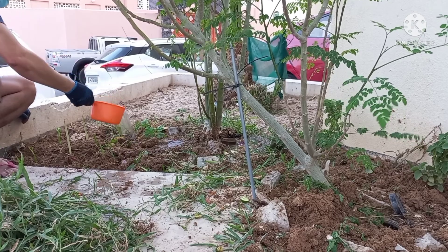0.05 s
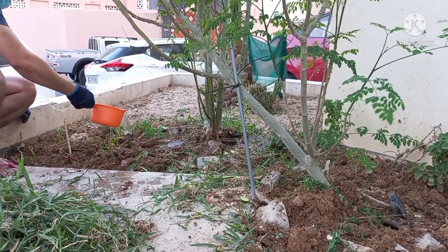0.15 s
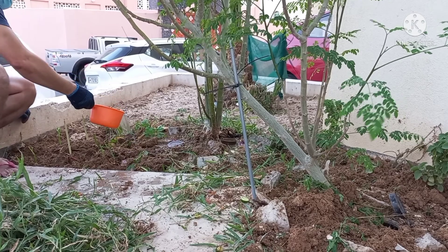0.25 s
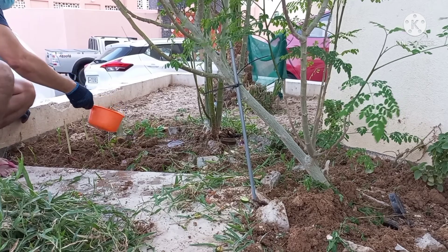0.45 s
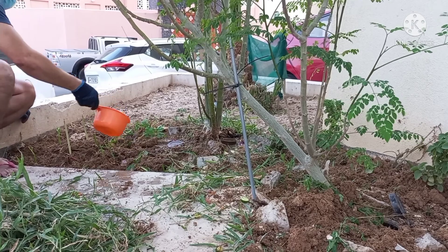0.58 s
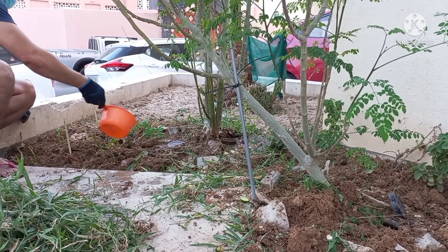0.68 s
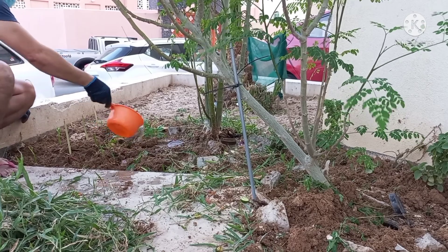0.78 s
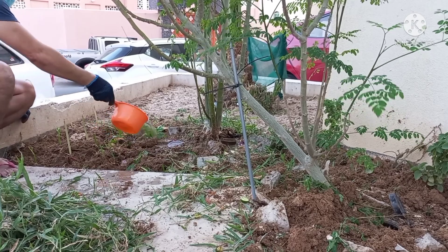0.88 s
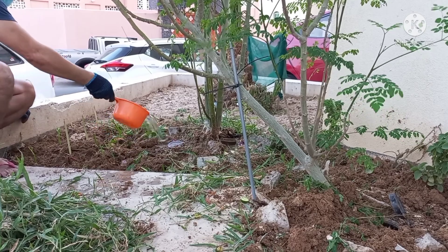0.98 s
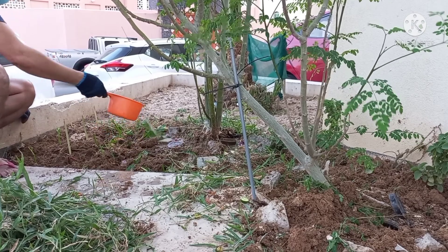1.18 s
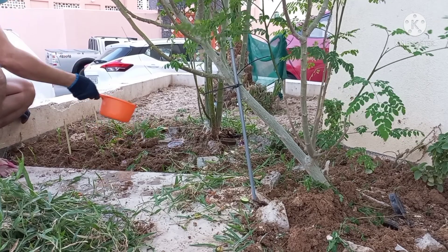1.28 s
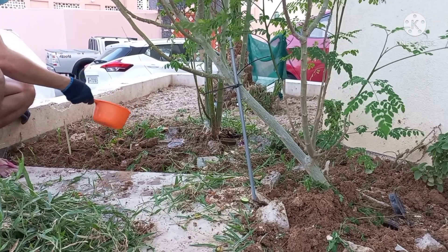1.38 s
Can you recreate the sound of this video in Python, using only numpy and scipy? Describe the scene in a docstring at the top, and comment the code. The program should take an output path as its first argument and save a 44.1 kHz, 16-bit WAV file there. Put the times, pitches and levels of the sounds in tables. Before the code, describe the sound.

Two scoops of water patter onto soil and leaves over a faint traffic rumble.

```python
"""A garden bed, with distant traffic rumbling throughout. Water is flung from a plastic scoop and comes
down near the microphone: a soft shower of tiny drops on soil and leaves, a few larger ones that plink,
small bubbles where it pools. A short gust buffets the microphone as the water lands. A thin sizzle
fills the lull, then, about a second in, another, lighter throw falls in weaker wind."""
import sys
import numpy as np
from scipy import signal
from scipy.fft import rfft, irfft
from scipy.io import wavfile

SR = 44100
rng = np.random.default_rng(int(sys.argv[2]) if len(sys.argv) > 2 else 0)


def wav_record(signal):
    """Record a signal, one row per channel, as 16-bit PCM in the file named by sys.argv[1]."""
    frames = np.transpose(np.atleast_2d(signal))
    bounded = np.clip(frames, -1, 1)
    # unit amplitude maps onto the largest positive 16-bit level
    quanta = np.round(bounded * 32767).astype(np.int16)
    wavfile.write(sys.argv[1], SR, quanta)


N = 63945
TIME = np.arange(N) / SR
BIN_HZ = np.arange(N // 2 + 1) * SR / N
NONZERO_HZ = np.maximum(BIN_HZ, 1)
LOW_CUT_HZ, HIGH_CUT_HZ = 32, 14250
FALL_60_DB = np.log(1000)   # exponent that takes a ring down by 60 dB


def from_db(db):
    """Decibels to gain."""
    return 10 ** (np.asarray(db) / 20)


def unit_rms(x):
    """Scale to unit power."""
    return x / np.sqrt(np.mean(x ** 2) + 1e-20)


def envelope(rows):
    """Gain through (s, dB) points."""
    return from_db(np.interp(TIME, *np.transpose(rows)))


def swells(rows):
    """Gain from bell-shaped swells of (centre s, peak dB, half length s)."""
    return sum(from_db(db) * np.exp(-.5 * ((TIME - s) / length) ** 2) for s, db, length in rows)


def colour(x, points):
    """Filter by (Hz, dB) points, falling 30 dB an octave past both ends; rms 1."""
    hz, db = np.transpose(points)
    octave, known = np.log2(NONZERO_HZ), np.log2(hz)
    outside = np.abs(octave - np.clip(octave, known[0], known[-1]))
    gain = from_db(np.interp(octave, known, db) - 30 * outside)
    return unit_rms(irfft(rfft(x) * gain, N))


def noise(points):
    """Noise with the given spectrum; rms 1."""
    return colour(rng.standard_normal(N), points)


def band_noise(hz, width_hz):
    """Noise in one bell-shaped band, a random wobble when centred on 0 Hz; rms 1."""
    bell = np.exp(-2 * ((BIN_HZ - hz) / width_hz) ** 2)
    return unit_rms(irfft(rfft(rng.standard_normal(N)) * bell, N))


def widen(mid, side, side_db):
    """Left and right from a middle and a weaker side signal."""
    return mid + from_db(side_db) * side * np.array([[1], [-1]])


def pan(db):
    """Left and right gains for a level difference; positive leans left."""
    return from_db(db * np.array([[.5], [-.5]]))


# The open air over the garden. Each row: frequency in Hz, relative level in dB.
AIR_SPECTRUM = [(1500, -3), (2500, -24), (4000, -12), (5500, 2.5), (7500, 6.5), (10000, -1.5), (12500, -6),
                (14000, -3)]
def open_air():
    """A very faint, wide hiss all round the microphone."""
    return from_db(-87) * widen(noise(AIR_SPECTRUM), noise(AIR_SPECTRUM), side_db=-7)


# The street, heard from far off. Each row: frequency in Hz, relative level in dB.
TRAFFIC_SPECTRUM = [(25, -30), (45, 0.5), (70, -4), (105, -3), (135, -13.5), (200, -13), (265, -16.5),
                    (350, -20.5), (500, -24.5), (800, -29), (1020, -28), (1400, -34.5), (1800, -36.5),
                    (2300, -49.5), (3200, -50)]
def distant_traffic(rumble_db=-55.5, waver_db=1.1, tyre_hz=817, engine_db=-59.5):
    """Far traffic rumbles, its tyre noise a little to the right, and one engine drones."""
    rumble = widen(noise(TRAFFIC_SPECTRUM), noise(TRAFFIC_SPECTRUM), side_db=-27.5)
    rumble *= from_db(rumble_db + waver_db * band_noise(0, width_hz=10))
    tyre_band = np.exp(-2 * np.log2(NONZERO_HZ / tyre_hz) ** 2)
    rumble = irfft(rfft(rumble) * pan(-4.5 * tyre_band), N)
    engine = from_db(engine_db) * band_noise(hz=99.9, width_hz=3.1)
    return (rumble + engine) * pan(0.32)


# Turbulence right at the microphone. Each row: frequency in Hz, relative level in dB.
WIND_SPECTRUM = [(28, -32), (45, -1), (70, 4.5), (110, -1), (160, -11.5), (260, -34.5), (400, -45)]
# Strength of the gust. Each row: time in seconds, level in dB.
GUST_LEVEL = [(0, -52.5), (.12, -66.5), (.17, -57.5), (.235, -44), (.33, -45.5), (.38, -42), (.48, -49.5),
              (.52, -52), (.56, -80), (1.06, -67), (1.15, -49.5), (1.23, -63), (1.29, -57.5), (1.38, -53),
              (1.45, -57.5)]
# Finer eddies in the gust. Each row: centre in seconds, level at the crest in dB, half length in seconds.
EDDIES = [(.19, -63.5, 0.061), (.404, -47, 0.015), (0.476, -57, 0.033)]
# Single buffets on the microphone. Each row: centre in seconds, envelope peak in dB, pitch in Hz.
WIND_BUFFETS = [(0.4, -33.5, 157), (.423, -23, 88), (0.464, -36.5, 66.6), (0.48, -36, 99)]
def wind_on_microphone(buffet_cycles=0.46):
    """Gusts of low turbulence with brief flutters and a few single thumps of pressure."""
    out = envelope(GUST_LEVEL) * widen(noise(WIND_SPECTRUM), noise(WIND_SPECTRUM), side_db=-21)
    out += swells(EDDIES) * band_noise(hz=220, width_hz=182)
    for centre, db, hz in WIND_BUFFETS:
        cycles = (TIME - centre) * hz
        bell = np.exp(-.5 * (cycles / buffet_cycles) ** 2)
        out -= from_db(db) * np.sin(2 * np.pi * cycles) * bell
    return out * pan(0.5)


# The garden bed between the throws. Each row: time in seconds, level in dB.
SIZZLE_LEVEL = [(.62, -106), (.68, -85.5), (.72, -79), (.77, -84.5), (.87, -91), (.95, -105)]
def sizzle():
    """A thin sizzle comes and goes in the lull."""
    return envelope(SIZZLE_LEVEL) * band_noise(hz=4500, width_hz=820)


def rising_note(hz, t, rise_per_s):
    """A bubble's tone, climbing by a fraction of its starting pitch each second."""
    return np.sin(2 * np.pi * hz * t * (1 + rise_per_s * t / 2))


def bubbles(centre_hz, spread_oct, per_s, ring_cycles=110, spread_db=4):
    """Trapped air rings in random short notes around one pitch, each rising as it dies; rms 1."""
    out, t = np.zeros(N + SR), np.arange(SR // 20) / SR
    for when, pitch, size in rng.random((int(per_s * N / SR), 3)):
        start = int(when * N)
        hz = centre_hz * 2 ** (spread_oct * (2 * pitch - 1))
        gain = from_db(spread_db * (2 * size - 1))
        attack, decay = 1 - np.exp(-hz * t / 2), np.exp(-FALL_60_DB * hz * t / ring_cycles)
        out[start:start + len(t)] += gain * attack * decay * rising_note(hz, t, rise_per_s=2.2)
    return unit_rms(out[:N])


# Small bubbles in the water on the bed. Each row: time in seconds, level in dB.
FIZZ_LEVEL = [(.06, -108), (.125, -74), (.19, -72), (.3, -78), (.45, -77), (.52, -79.5), (.6, -93),
              (.92, -98), (1.0, -82), (1.05, -74.5), (1.14, -78.5), (1.22, -81.5), (1.33, -94)]
# Larger bubbles among them. Each row: time in seconds, level in dB.
GURGLE_LEVEL = [(.1, -105), (.19, -77), (.24, -90), (.46, -86.5), (.58, -102), (.92, -93), (1.05, -83.5),
                (1.13, -85), (1.205, -79.5), (1.3, -88.5), (1.45, -98)]
def puddle():
    """Where the water pools, small bubbles fizz and larger ones gurgle."""
    fizz = envelope(FIZZ_LEVEL) * bubbles(centre_hz=3500, spread_oct=.13, per_s=790)
    gurgle = envelope(GURGLE_LEVEL) * bubbles(centre_hz=2350, spread_oct=.27, per_s=400)
    return fizz + gurgle


# Water hitting the soil. Each row: centre in seconds, level at the crest in dB, half length in seconds.
SOIL_SLAPS = [(.435, -70.5, 0.019), (1.045, -77.5, 0.016)]
def soil_slaps():
    """The bulk of each throw slaps softly on the soil."""
    return swells(SOIL_SLAPS) * band_noise(hz=1370, width_hz=970)


# Splashing on soil and leaves, close by. Each row: frequency in Hz, relative level in dB.
SPLASH_SPECTRUM = [(1800, -6), (2200, -15), (2700, -21), (3050, -8.5), (3400, -4.5), (4400, -1.5),
                   (5500, -2.5), (6300, -7), (7500, -2.5), (9000, -13), (10300, -15), (11300, -6.5),
                   (12500, -0.3), (14200, -2)]
def patter(per_s=5600, spread_db=4.5, largest_db=11.5, pitches=24, ring_cycles=20, cluster_db=0):
    """Countless droplets of random size, each ringing briefly at one of a set of pitches; rms 1."""
    sizes = from_db(np.minimum(spread_db * rng.exponential(1, N), largest_db))
    signs = rng.choice([-1, 1], N)
    hits = sizes * signs * (rng.random(N) < per_s / SR)
    pitch_index = rng.integers(0, pitches, N)
    out = 0
    for k, hz in enumerate(np.linspace(2110, HIGH_CUT_HZ, pitches)):
        radius, angle = np.exp(-FALL_60_DB * hz / (ring_cycles * SR)), 2 * np.pi * hz / SR
        resonator = [1, -2 * radius * np.cos(angle), radius ** 2]
        clustering = from_db(cluster_db * band_noise(0, width_hz=51))   # at 0 dB the patter stays even
        strikes = hits * (pitch_index == k) * clustering
        out += unit_rms(signal.lfilter([1, 0, -1], resonator, strikes + 1e-18))
    return colour(out, SPLASH_SPECTRUM)


# Larger drops that plink near the microphone. Each row: start in seconds, level in dB, pitch in Hz,
# time to fall 60 dB in seconds, bandwidth of the splat in Hz.
LARGE_DROPS = [(.075, -55, 12500, 0.048, 1500), (.146, -64, 2950, .04, 300), (.179, -52, 3500, 0.02, 900),
               (.222, -60, 5370, .025, 450), (.223, -56, 6550, 0.03, 900), (.254, -54, 5100, 0.041, 950),
               (.271, -53, 5540, 0.024, 400), (.279, -51, 5000, 0.025, 1290), (.300, -56, 4500, .029, 1200),
               (.320, -47, 3980, 0.015, 503), (.339, -50, 3400, 0.02, 300), (.353, -56, 3400, 0.016, 252),
               (.376, -59, 3330, 0.02, 250), (.406, -54, 4460, 0.025, 1600), (.482, -74, 5300, .03, 700),
               (.527, -67.5, 5660, 0.055, 500), (.556, -66, 5030, 0.025, 350),
               (.926, -60.5, 2570, 0.028, 650), (.970, -67, 4400, 0.042, 400),
               (1.026, -64, 3750, 0.063, 1100), (1.037, -66, 2260, 0.064, 750),
               (1.053, -63, 3550, 0.036, 800), (1.109, -53.5, 4000, 0.022, 380),
               (1.162, -61, 3600, 0.027, 600), (1.196, -63, 7940, 0.055, 2000)]
def large_drops(attack_s=0.0027, tick_db=-25, tick_s=0.00072, note_db=-4.5):
    """Each large drop makes a tick, a wet splat and a short bubble note that rises in pitch."""
    out, tick = 0, from_db(tick_db) * noise(SPLASH_SPECTRUM)
    for start, db, hz, t60, width_hz in LARGE_DROPS:
        t = np.maximum(TIME - start, 0)
        attack, decay = 1 - np.exp(-t / attack_s), np.exp(-FALL_60_DB * t / t60)
        splat = band_noise(hz, width_hz)
        plink = splat + from_db(note_db) * rising_note(hz, t, rise_per_s=2)
        plink /= np.sqrt(np.average(plink ** 2, weights=(attack * decay) ** 2))   # rms 1 while it sounds
        out += from_db(db) * attack * (plink * decay + tick * np.exp(-t / tick_s))
    return out


# Flow of water landing on the bed, both throws. Each row: time in seconds, relative level in dB.
FLOW_LEVEL = [(0, -65.5), (.025, -65.5), (.05, -72.5), (.08, -66.5), (.15, -61), (.27, -62), (.42, -63.5),
              (.48, -65), (.54, -72), (.59, -78), (.72, -87), (.88, -81), (.96, -70), (1.03, -66.5),
              (1.09, -71.5), (1.165, -67), (1.31, -73), (1.45, -88)]
# The finest spray, strongest early in the first throw. Each row: time in seconds, level in dB.
MIST_LEVEL = [(0, -74), (.05, -78), (.08, -67), (.15, -65.5), (.25, -74.5), (.41, -69), (.48, -85),
              (.6, -105), (.88, -100), (.99, -76), (1.16, -74.5), (1.27, -84), (1.45, -100)]
# The dull wash of wet earth. Each row: frequency in Hz, relative level in dB.
SOIL_SPECTRUM = [(800, -15), (1150, 2.5), (1750, 13), (2100, -10), (3000, -20)]
# Spray scattered to either side of the microphone. Each row: frequency in Hz, relative level in dB.
SCATTER_SPECTRUM = [(3000, -30), (4000, -42), (7500, -5), (10000, -4), (12500, 6), (14200, 12)]
def showers(patter_db=-5.5, spray_db=-6, soil_db=-17.5, clump_db=1.63, clump_hz=60.5):
    """Water lands in clumps, driving droplets, spray and the wash of wet soil, with fine mist on top."""
    clumps = from_db(clump_db * band_noise(0, clump_hz))
    mist = envelope(MIST_LEVEL) * band_noise(hz=11960, width_hz=4400) * pan(0.5)
    droplets = from_db(patter_db) * patter()
    spray = from_db(spray_db) * noise(SPLASH_SPECTRUM)
    wash = from_db(soil_db) * noise(SOIL_SPECTRUM)
    water = widen(droplets + spray + wash, noise(SCATTER_SPECTRUM), side_db=-19.5)
    return clumps * (envelope(FLOW_LEVEL) * water + mist)


def scene():
    """Water close by, wind on the microphone and the street far behind."""
    water = sizzle() + soil_slaps() + showers() + puddle() + large_drops()
    return water + wind_on_microphone() + distant_traffic() + open_air()


def record(dry):
    """At the microphone the deepest bass is rolled off and the top is cut steeply."""
    thinned = irfft(rfft(dry) / np.sqrt(1 + (LOW_CUT_HZ / NONZERO_HZ) ** 10), N)
    high_cut = signal.ellip(12, .2, 70, HIGH_CUT_HZ, fs=SR, output="sos")
    return signal.sosfilt(high_cut, thinned)


dry = scene()
out = record(dry)
wav_record(out)
```